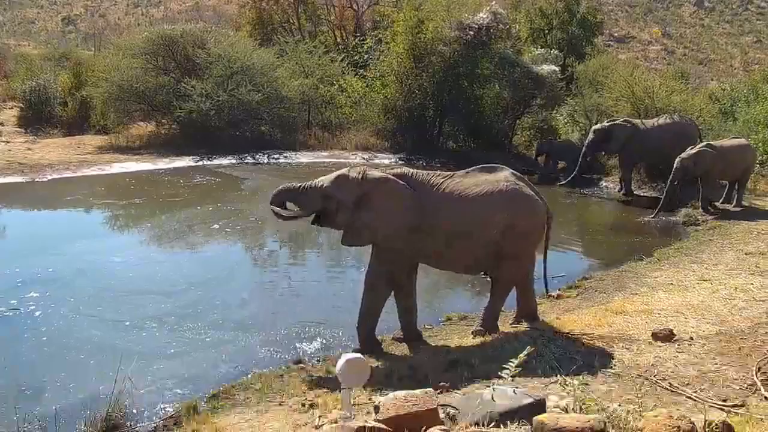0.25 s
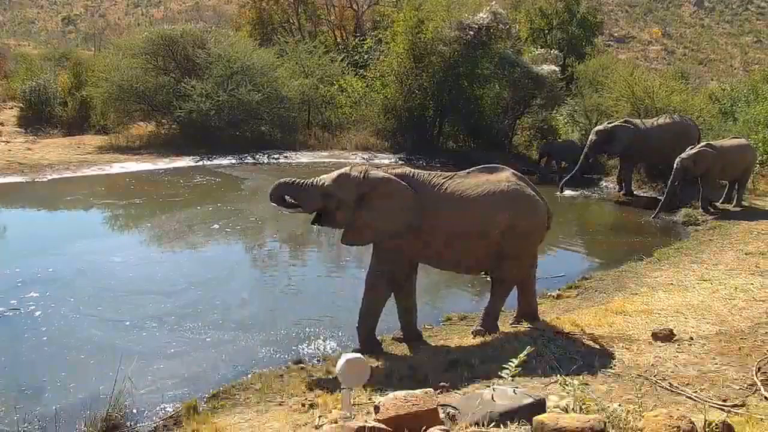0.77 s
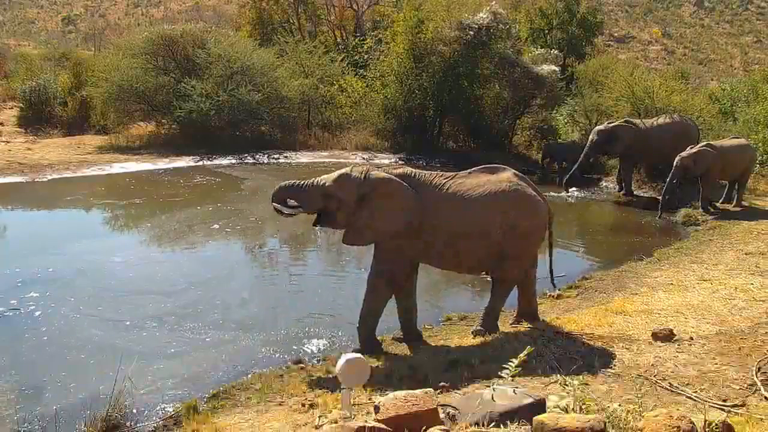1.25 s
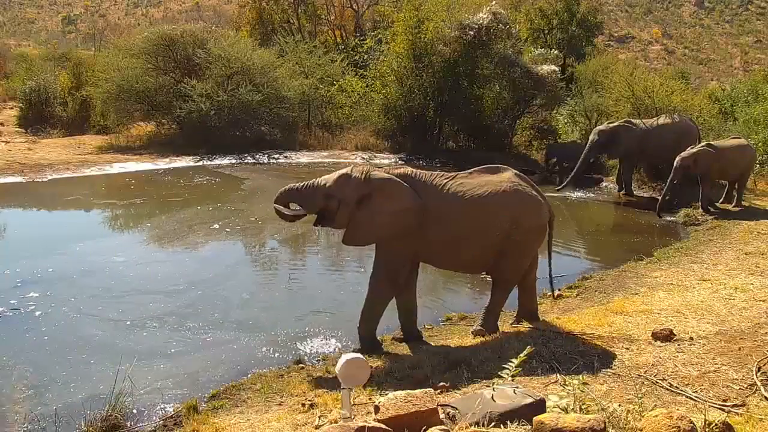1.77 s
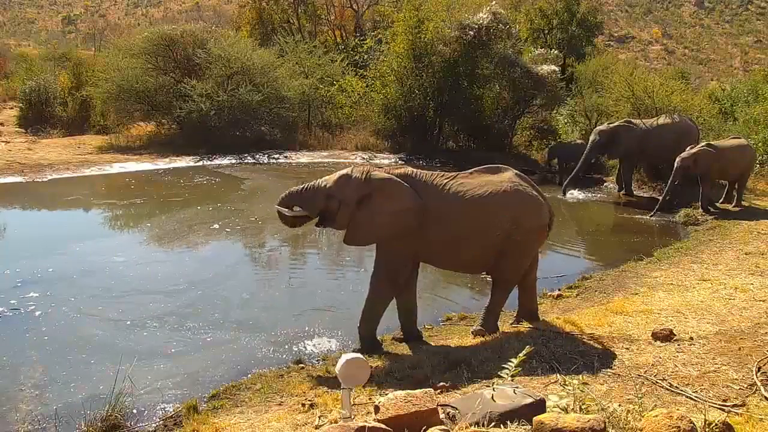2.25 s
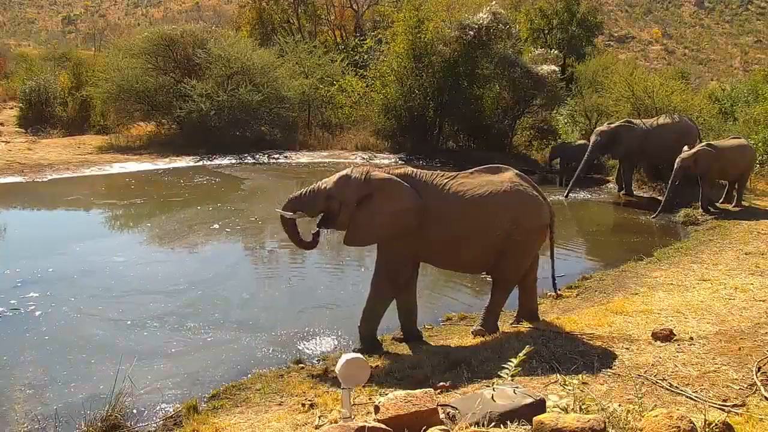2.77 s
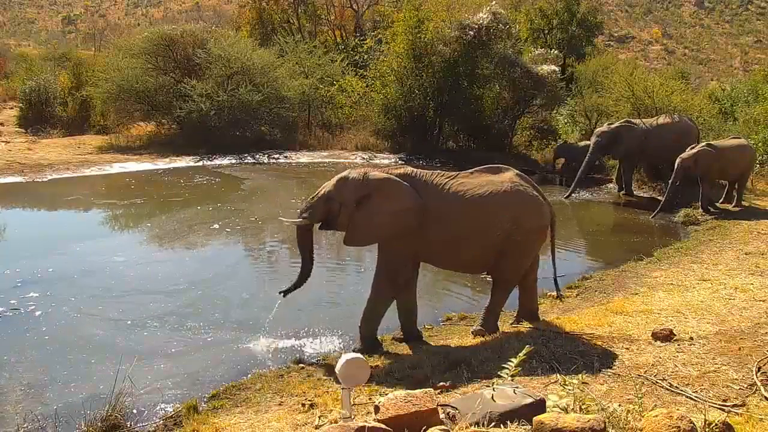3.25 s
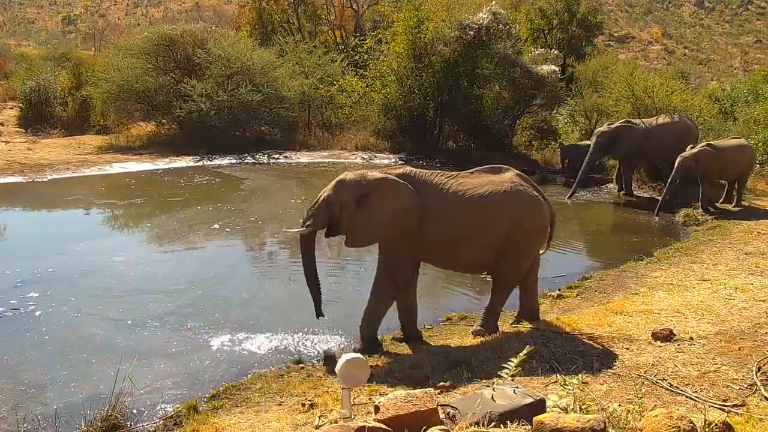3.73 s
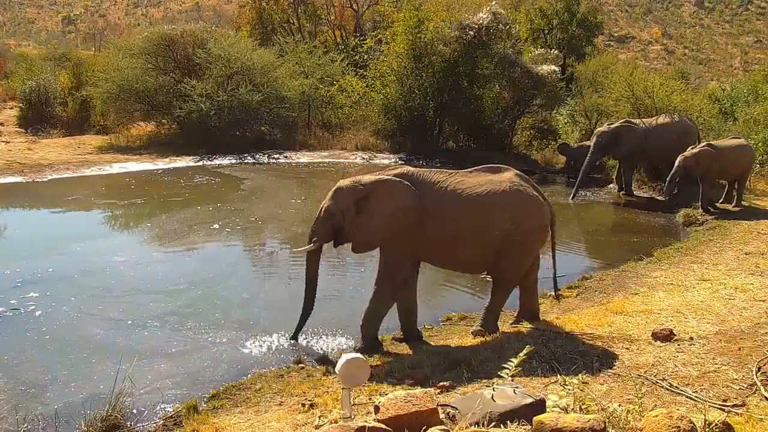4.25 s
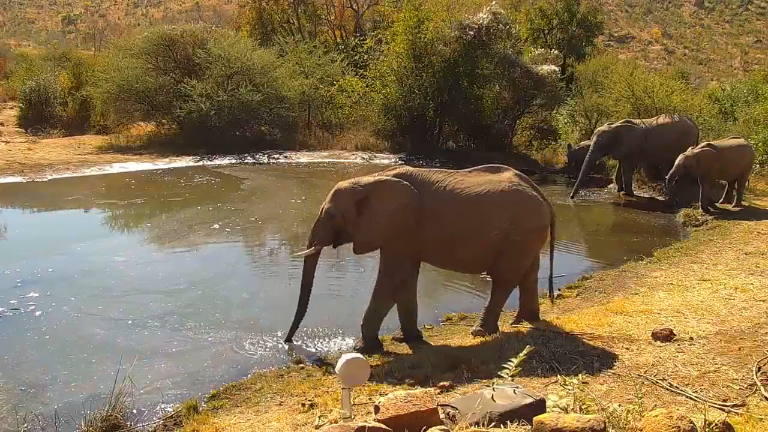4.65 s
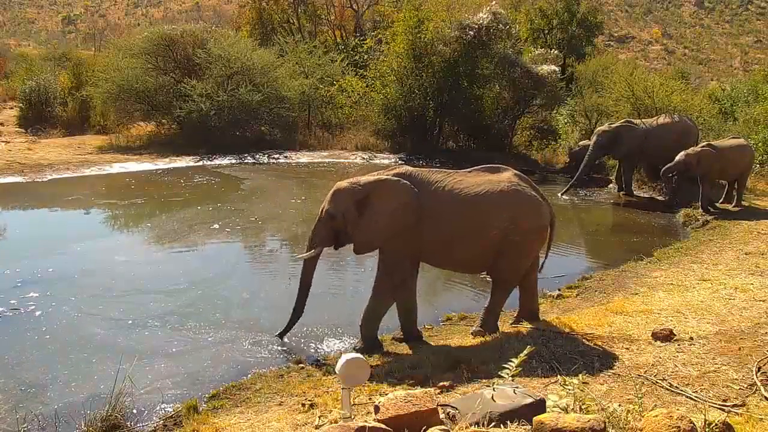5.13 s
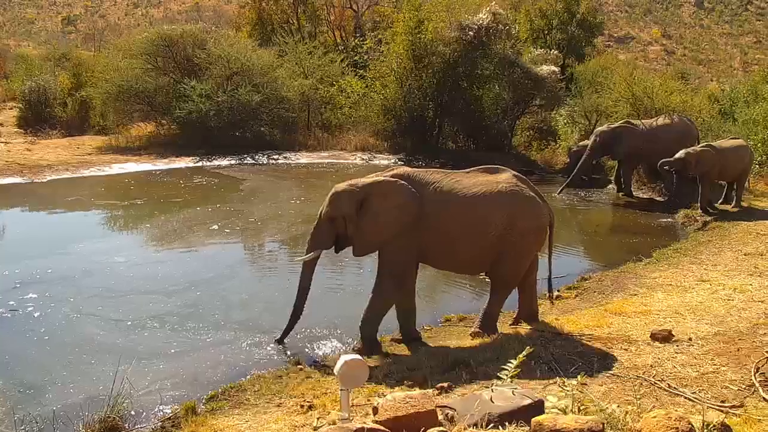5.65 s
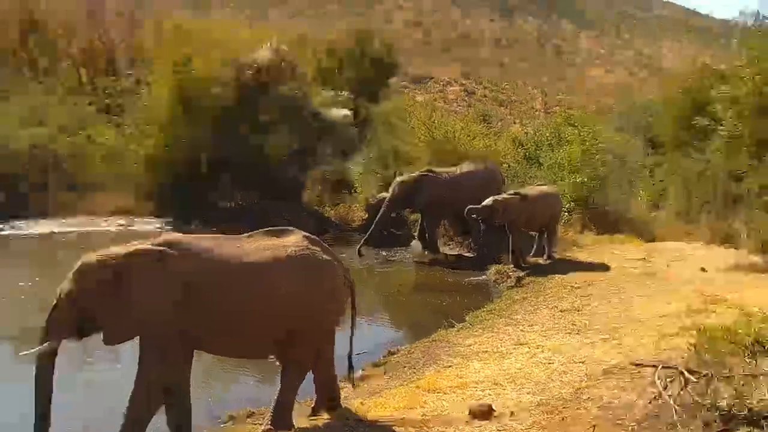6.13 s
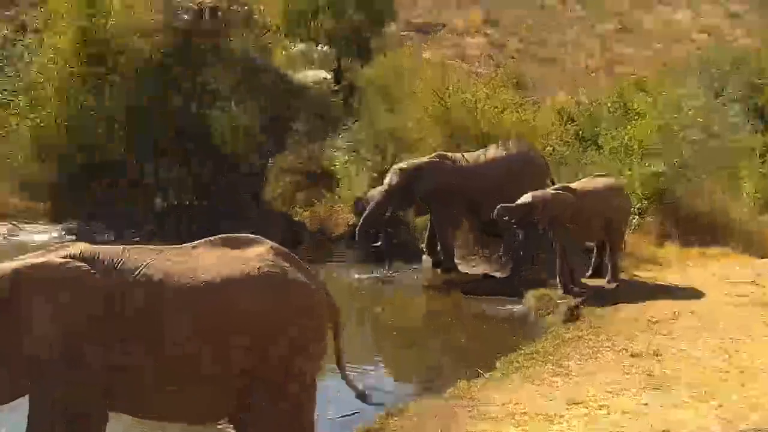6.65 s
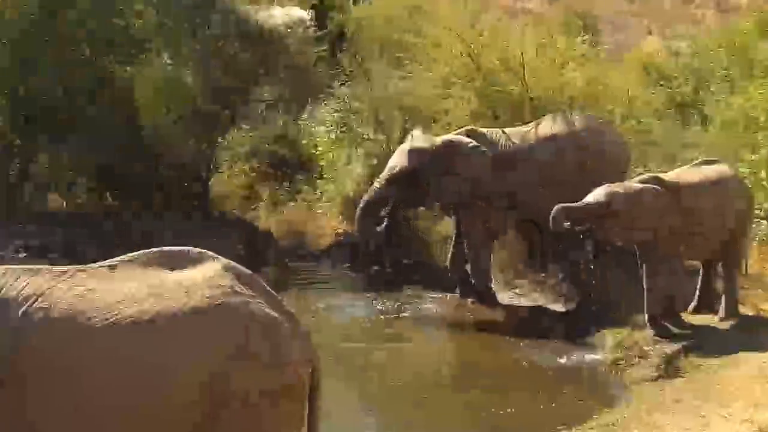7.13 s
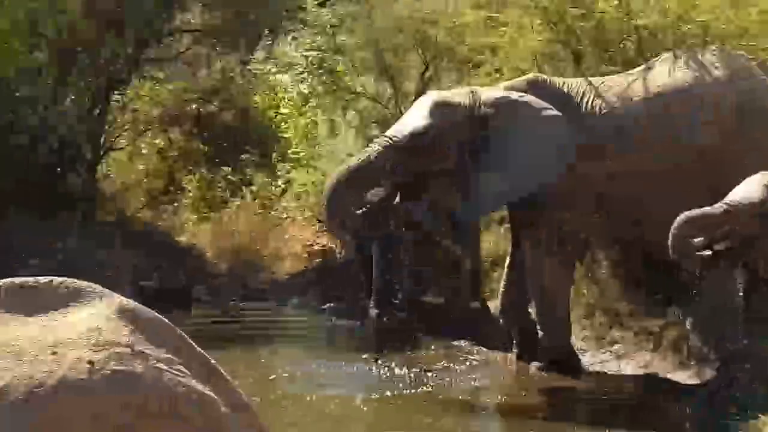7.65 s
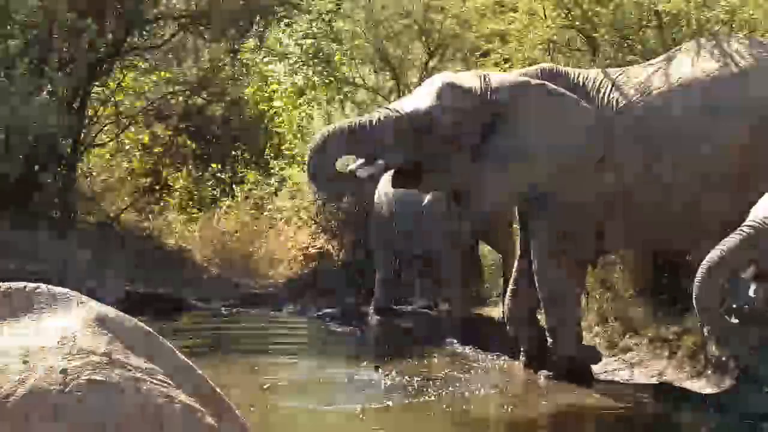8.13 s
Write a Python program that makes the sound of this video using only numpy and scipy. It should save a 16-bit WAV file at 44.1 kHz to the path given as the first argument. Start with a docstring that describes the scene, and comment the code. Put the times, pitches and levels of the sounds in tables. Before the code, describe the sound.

Water spills, drips and gulps from elephants' trunks at a pond, heard boxily, before a loud mechanical jolt, gritty grind and buzzing motor whirr.

```python
"""Elephants drinking at a waterhole

Heard by a microphone shut inside a remote camera's housing; cavity resonances colour the water and far rustle.
Trunks spill noise-burst sprays, ringing drops and gliding-sine gulps; a small bird chirps in gliding sines.
A pan drive jolts as decaying modes and grinds as filtered noise; a zoom drive whirrs as a comb of tones.
Beneath lie noise for wind, rustle and hiss, and steady multiples of the rectified mains."""
import sys
import numpy as np
from scipy import signal
from scipy.fft import rfft, irfft, next_fast_len
from scipy.io import wavfile
from scipy.ndimage import uniform_filter1d, map_coordinates

SR = 44100
rng = np.random.default_rng(int(sys.argv[2]) if len(sys.argv) > 2 else 0)


def dump(signal):
    """Clip the signal to [-1, 1] and save it as 16-bit WAV at the path in sys.argv[1]."""
    limited = np.clip(np.atleast_2d(signal).T, -1, 1)
    pcm = np.round(limited * 32767).astype(np.int16)
    wavfile.write(sys.argv[1], SR, pcm)


N = 369999

# WATER
# steady dribbling between spills: t/s, level/dB
TRICKLE = [(0, -54.5), (.7, -61), (1.05, -52), (1.35, -53.5), (1.85, -57), (2.1, -58), (3.05, -56.5),
           (3.7, -58), (4.1, -56), (4.55, -58), (5, -58), (5.5, -59.5), (6.58, -48.5), (7, -53),
           (7.4, -55.5), (8.39, -57)]
# water spilling from trunks and mouths: start t/s, build-up/s, hold/s, spray level/dB, fizz level/dB
SPILLS = [(0.155, 0.054, 0.04, -46.5, -68), (0.307, 0.037, 0.038, -47, -74),
          (0.465, 0.025, 0.043, -49, -69), (0.843, 0.033, 0.042, -46.5, -69.5), (1.17, .05, .03, -49, -81),
          (1.42, .15, 0.16, -46, -75), (1.916, 0.043, 0.026, -44.5, -69), (2.128, 0.032, 0.11, -46.5, -72),
          (2.307, 0.11, 0.13, -45.5, -65.5), (2.45, .12, .22, -42.5, -64.5),
          (2.817, .02, 0.021, -46, -65.5), (3.095, 0.027, .02, -53, -73), (3.179, 0.026, 0.24, -47.5, -65),
          (3.89, 0.026, 0.022, -55, -72), (4.245, 0.034, 0.087, -57, -75), (4.68, 0.055, 0.13, -55, -75),
          (5.353, .02, 0.028, -52.5, -82), (5.62, .04, 0.092, -55.5, -73), (5.746, 0.046, 0.13, -46, -63.5),
          (5.822, 0.13, 0.41, -42.5, -60.5), (6.047, .015, 0.032, -43.5, -58),
          (6.177, 0.018, .01, -40.5, -60.5), (6.282, 0.014, 0.16, -36.5, -57)]
# lapping at the edge: t/s, level/dB
LAPPING = [(0, -50), (.34, -40.5), (.65, -49), (1.4, -44), (2, -52), (2.6, -38), (3.05, -53), (3.24, -41),
           (3.42, -42), (3.56, -57.5), (4.25, -45.5), (4.7, -48), (4.87, -42), (5.1, -53), (5.6, -40.5)]
# spray spectrum: f/Hz, level/dB
SPRAY_BAND = [(500, -11.5), (1200, -7.5), (2000, 0), (4500, 2), (5200, -9.5), (6000, -29.5)]
# fizz spectrum: f/Hz, level/dB
FIZZ_BAND = [(4800, -20.5), (5600, 3.5), (9000, -1.5), (11000, 3)]
# lapping spectrum: f/Hz, level/dB
LAPPING_BAND = [(180, -27), (280, 0.5), (600, -6.5), (1200, -31)]
# single drops: t/s, peak/dB, f/Hz, tick over peak/dB
DROPS = [(0.2229, -39, 1980, -26), (0.5434, -42, 2920, 0), (0.6724, -38.5, 2850, -22),
         (0.8724, -39, 2740, -20), (1.2261, -33.5, 3450, -20), (1.3169, -34, 3460, -29),
         (1.4401, -38.5, 2010, -13), (1.5694, -36.5, 1970, -24), (1.702, -34, 2830, -28),
         (1.8744, -42, 3950, -5), (2.0722, -41, 4050, -22), (2.157, -38, 3950, -24),
         (2.5082, -35, 2880, -22), (2.5681, -29, 2930, -27), (2.5975, -30, 2730, -25),
         (2.6499, -28.5, 3500, -25), (3.2111, -32, 2900, -23), (3.2645, -33.5, 2900, -23),
         (3.3997, -37, 2900, -20), (3.4915, -36.5, 3440, -24), (3.5967, -34.5, 2860, -21),
         (3.7249, -34.5, 2760, -17), (3.8013, -28, 3020, -19), (3.9305, -34.5, 3020, -23),
         (4.0711, -38, 2920, -8), (4.119, -38, 3440, -23), (4.2632, -37, 2730, -18),
         (4.339, -38, 2850, -26), (4.4084, -41, 2880, -1), (4.7062, -33.5, 2780, -28),
         (4.8319, -35.5, 2730, -28), (5.0384, -36, 1990, -28), (5.2041, -31, 1900, -8),
         (5.448, -35, 2890, -25), (5.5702, -42.5, 2890, -3), (5.8576, -34, 2880, -24),
         (5.9304, -32.5, 2050, -17), (5.9678, -30, 1910, -21), (6.0541, -26, 1890, -20),
         (6.0794, -28.5, 2870, -16), (6.1823, -25.5, 2860, -27), (6.3041, -20, 2830, -12),
         (6.4028, -23, 1930, -28), (6.8495, -40, 2000, -13), (6.9396, -48, 2010, 3),
         (7.0304, -39.5, 3460, -18), (7.2125, -37.5, 3460, -14), (7.2737, -40, 4450, -8),
         (7.3238, -38.5, 2730, -14), (7.4525, -44, 2730, -6), (7.5188, -41, 4100, -20),
         (7.7952, -38, 3480, -15), (7.8166, -38, 4090, -6), (7.8955, -33.5, 3460, -13),
         (8.03, -41.5, 4450, -13), (8.1174, -32.5, 3460, -18), (8.2896, -34, 3370, -29),
         (8.3305, -40, 4440, -6)]
# bright edge of a drop: f/Hz, level/dB
TICK_BAND = [(3300, -18.5), (4300, 0), (7000, -0.5), (11000, -7.5)]
# large bubbles: t/s, peak before envelope/dB, start f/Hz
GULPS = [(.332, -21, 368), (1.035, -24, 302), (1.118, -24.5, 370), (1.443, -21, 322), (1.649, -24.5, 356),
         (1.99, -19, 353), (2.286, -25, 368), (2.442, -27, 175), (2.445, -21, 329), (2.565, -16.5, 366),
         (2.634, -16, 360), (3.24, -25, 351), (3.316, -21, 365), (4.358, -24.5, 250), (4.859, -19, 293),
         (4.884, -24, 302), (5.196, -17.5, 493), (5.2, -30.5, 1363), (5.2, -27.5, 252), (5.441, -16, 372),
         (5.566, -21, 352), (7.15, -36, 1390)]
# low thud: t/s, gain/dB, push time/s
THUD = (2.446, -27.5, 0.00083)
BUILD_DB, FALL_DB_PER_S = 11.5, 114
FIZZ_OVER_TRICKLE_DB = -17.5
GURGLE_DB, GURGLE_KNOTS_PER_S = 1.5, 14  # random unevenness of the flow
DROP_T60_S, GULP_T60_S = 0.043, 0.067

# DRIVES
# start of the pan drive: t/s, gain/dB
JOLT = (5.654, -4.5)
# frame modes rung by the jolt: f/Hz, level/dB, undamped t60/s
FRAME = [(275, -23.5, 0.23), (361, -9, 0.096), (374.3, -1.5, 0.21), (425, -6, 0.068), (493, -4.5, 0.083),
         (732, -29, 0.15), (1250, -27, 0.06)]
# pan drive: t/s, grind level/dB, teeth level/dB
PAN = [(5.7, -49, -48.5), (5.755, -38.5, -41), (5.785, -23.5, -46), (5.96, -23, -46), (6.12, -21, -44),
       (6.2, -23.5, -53.5), (6.25, -30.5, -52), (6.4, -42, -48)]
# gear resonances under the grind: f/Hz, width/Hz, level/dB
GEARS = [(258, 9.3, -9), (343, 15.7, -0.5), (374, 20, -7.5), (457.8, 24.3, 1.5), (504.4, 19.5, -5)]
# gear tooth resonances: f/Hz, width/Hz, level/dB
TEETH = [(972, 30, -5), (1242, 105, -3.5), (1335, 82, -5)]
# band limits of the grind: f/Hz, level/dB
GRIND_BAND = [(200, -36), (260, -4.0), (530, -3.5), (620, -17.5), (900, -21)]
# zoom drive: t/s, level/dB
ZOOM = [(6.25, -31.5), (6.4, -32), (6.75, -30), (7.03, -27), (7.06, -37), (7.1, -26), (7.3, -32.5),
        (7.62, -31.5), (7.66, -42), (7.75, -33), (7.88, -45), (8.1, -42.5), (8.39, -51)]
# zoom tones: multiple of STEP_HZ, level when wide/dB, level when zoomed in/dB
ZOOM_TONES = [(12, -22, -27), (13, -7, -2.5), (14, -7, -9), (15, -0.5, 0.5), (16, -6.5, -5),
              (17, -0.5, -8.5), (18, -11.5, -13), (19, -21, -8), (20, -13.5, -10.5), (21, -6, -20),
              (22, -19.5, -22.5), (23, -23.5, -34.5), (33, -33, -23.5), (34, -23, -17)]
# high band of the zoom gearing: f/Hz, width/Hz, level over drive/dB
WHIRR = (1350, 140, -30.5)
# murmur of the zoom drive: f/Hz, level/dB
MURMUR_BAND = [(270, -23), (320, -2.0), (540, -8.0), (620, -13.5), (760, -15.5), (900, -31)]
THROB_DB = 0.5
STEP_HZ = 25.04  # repeat rate of the zoom drive's moves

# BIRD
# rising chirps: t/s, length/s, start f/Hz, level/dB
CHIRPS = [(.14, .06, 6100, -64), (.27, .04, 6400, -70), (1.183, .035, 6300, -67), (6.682, .05, 6400, -70),
          (6.68, .045, 7900, -69), (6.785, .035, 7950, -67), (6.79, .03, 6300, -62),
          (6.833, .035, 6500, -70), (7.615, .04, 6400, -63)]
# falling peeps: t/s, length/s, start f/Hz, level/dB
PEEPS = [(1.756, .03, 4200, -54), (1.855, .03, 4250, -48), (1.948, .03, 4250, -48),
         (2.063, 0.038, 4300, -48), (6.9, .025, 6900, -67), (7.235, .025, 6500, -66),
         (7.49, .02, 6700, -68), (7.747, .022, 5550, -53), (8.096, .055, 2950, -46.5)]
CHIRP_RISE_HZ_PER_S = 9300
PEEP_FALL_PER_S = 3  # share of start pitch lost a second

# BACKGROUND
# mains tones: multiple of MAINS_HZ, level/dB
HUM = [(5, -55), (7, -66.5), (8, -83), (9, -61.5), (11, -108), (13, -68.5), (14, -72.5), (15, -73.5)]
# whine of the pan motor at rest: multiple of MAINS_HZ, level/dB, end t/s
HOLD = (12, -56.5, 5.66)
# faint unsteady tone of the housing: f/Hz, level/dB
WAVER = (243, -61)
# wind on the housing: t/s, level/dB
WIND = [(0, -56), (1.3, -58.5), (1.75, -52.5), (2.4, -51.5), (2.7, -56.5), (3.6, -56.5), (3.97, -50.5),
        (4.5, -55), (5.6, -57.5), (5.7, -50.5), (6.15, -48), (6.3, -55.5), (7.1, -53.5), (8.39, -60)]
# wind spectrum: f/Hz, level per Hz/dB
BUFFET_BAND = [(15, -29.5), (25, -11), (50, -7.5), (90, -6.5), (130, 0), (200, -2.5), (300, -1.5)]
# distant bush and water: f/Hz, level/dB
AIR_BAND = [(150, -20), (300, 6), (1000, -1), (3000, -4), (6000, -7), (11000, -3)]
# microphone hiss: f/Hz, level/dB
HISS_BAND = [(100, -2.5), (1000, -7.5), (5000, -21.5), (9000, -32.5), (12000, -33)]
MAINS_HZ = 99.9  # rectified mains

# HOUSING AND RECORDER
# cavity resonances: f/Hz, width/Hz, level/dB
HOUSING = [(240, 40, -12), (370, 45.4, 3.5), (475.6, 61.5, 0), (686.5, 47.4, -6), (880, 45, -8),
           (974, 36, -9), (1280, 145, -11.5), (1900, 59.6, -10), (1992.5, 52, -8.5), (2740, 59, -11.5),
           (2890, 70, -10), (3043, 196, -17.5), (3460, 74, -12), (3950, 163, -19), (4162, 60, -17.5),
           (4450, 44, -20.5), (5030, 114, -18), (5470, 69, -28.5), (5700, 48, -43.5), (6450, 550, -35),
           (6970, 640, -35.5), (8190, 370, -34.5), (8770, 340, -37), (9900, 100, -42), (10730, 300, -48)]
# cancellation between two low cavity modes: f/Hz, width/Hz, depth/dB
NOTCH = (440, 72, -11.5)
TOP_HZ = 11150


def water():
    """Spray of droplets and bubbles, fine fizz following the flow, and lapping, all through the cavity."""
    spray_gain, fizz_gain = flow()
    splashes = unit(droplets(rate_per_s=150, spread_db=3.5, life_s=0.0015, bed=2.6))
    rain = splashes + 0.37 * bubbles(count=3500, centre_hz=4300, octaves=0.497, cycles=4.1, spread_db=2.5)
    ticks = unit(droplets(rate_per_s=42, spread_db=4.5, life_s=0.0013, bed=1.0))
    mist = ticks + .7 * rain
    spray = unit(filtered(rain, shape(SPRAY_BAND), cavity))
    fizz = unit(filtered(mist, shape(FIZZ_BAND), cavity))
    laps = droplets(rate_per_s=33, spread_db=2.5, life_s=0.0048, bed=2.2)
    laps = unit(filtered(laps, shape(LAPPING_BAND), cavity))
    lapping_gain = amp(curves(LAPPING)[0] + 2.6 * wobble(12))
    return spray_gain * spray + fizz_gain * fizz + lapping_gain * laps


def flow():
    """Gains of spray and fizz: powers of trickle and spills add, each spill building, holding and falling."""
    t = np.arange(N) / SR
    power = amp(2 * (curves(TRICKLE)[0] + np.array([[0], [FIZZ_OVER_TRICKLE_DB]])))
    for start_s, build_s, hold_s, spray_db, fizz_db in SPILLS:
        top_s = start_s + build_s
        build_loss_db = BUILD_DB * np.clip((top_s - t) / build_s, 0, 1)
        fall_loss_db = FALL_DB_PER_S * np.clip(t - top_s - hold_s, 0, 1)
        level_db = np.array([[spray_db], [fizz_db]]) - build_loss_db - fall_loss_db
        power = power + (t > start_s) * amp(2 * level_db)
    return np.sqrt(power) * amp(GURGLE_DB * wobble(GURGLE_KNOTS_PER_S))


def droplets(rate_per_s, spread_db, life_s, bed):
    """Short noise bursts of unequal size over a bed of noise."""
    hits = (rng.random(N) < rate_per_s / SR) * amp(spread_db * rng.standard_normal(N))
    u = np.arange(SR // 20) / SR / life_s
    bursts = unit(signal.fftconvolve(hits, u * np.exp(-u))[:N])
    return (bursts + bed) * rng.standard_normal(N)


def bubbles(count, centre_hz, octaves, cycles, spread_db):
    """Tiny bubbles at random times, each a few cycles of its own rising pitch."""
    draw, t = rng.standard_normal((count, 2)), np.arange(500) / SR
    hz = np.clip(centre_hz * 2 ** (octaves * draw[:, :1]), 500, SR / 3)
    u = t * hz / cycles
    envelope = amp(spread_db * draw[:, 1:]) * u * np.exp(-u)
    grain = envelope * np.sin(2 * np.pi * hz * t * (1 + 0.0285 * u))
    at = rng.integers(0, N, (count, 1)) + np.arange(len(t))
    return unit(np.bincount(at.ravel(), grain.ravel(), N)[:N])


def drops():
    """Each drop is a splat of noise round its pitch with a bright tick, both rung by the housing."""
    out, t = np.zeros(N), np.arange(SR // 10) / SR
    click = np.arange(N) == 100
    body = filtered(click, cavity)[100:len(t)]
    edge = filtered(click, shape(TICK_BAND), cavity)[:len(t)]  # keeps the 100-sample lead
    fall = amp(-60 * t / DROP_T60_S) * (1 - np.exp(-t / 0.00026))
    for s, db, hz, tick_db in DROPS:
        splat = signal.lfilter(*signal.iirpeak(hz, 3.6, SR), rng.standard_normal(len(t)))
        splat = signal.fftconvolve(fall * splat, body)
        tick = signal.fftconvolve(fall * rng.standard_normal(len(t)), edge)
        add(out, s - .001, amp(db) * peak_unit(splat))
        add(out, s - .003, amp(db + tick_db) * peak_unit(tick))
    return out


def gulps():
    """Large bubbles: sines with a soft start, exponential decay and slightly rising pitch."""
    out, t = np.zeros(N), np.arange(SR // 5) / SR
    swell = amp(-60 * t / GULP_T60_S) * (1 - np.exp(-t / 0.0051)) ** 2
    for s, db, hz in GULPS:
        tone = np.sin(2 * np.pi * hz * t * (1 + 1.0 * t) + rng.uniform(0, 2 * np.pi))
        add(out, s - .003, amp(db) * swell * tone)
    return out


def thud():
    """A single push of air and its rebound, with no ring."""
    out, (s, db, push_s) = np.zeros(N), THUD
    u = np.arange(SR // 20) / SR / push_s
    add(out, s, amp(db) * u * u * (3 - u) * np.exp(-u))
    return out


def pan_drive():
    """A jolt rings the frame until the gears take up their play, then they grind in uneven throbs."""
    out, t = np.zeros(N), np.arange(SR // 3) / SR
    ring = sum(amp(db - 60 * t / t60_s) * np.sin(2 * np.pi * hz * t) for hz, db, t60_s in FRAME)
    damping = 1 / (1 + np.exp((t - .078) / 0.0043))
    onset = (1 - np.exp(-t / 0.0045)) ** 2
    add(out, JOLT[0], amp(JOLT[1]) * ring * damping * onset)
    grind_db, teeth_db = curves(PAN)
    rubbing = droplets(rate_per_s=110, spread_db=-6.5, life_s=0.0087, bed=1.8)
    grind = filtered(rubbing, modes(GEARS), shape(GRIND_BAND))
    grind = levelled(grind, SR // 14)  # steady load: no long swells or gaps
    teeth = droplets(rate_per_s=48, spread_db=3.5, life_s=0.0048, bed=0.99)
    teeth = unit(filtered(teeth, modes(TEETH), modes(TEETH)))
    return out + amp(grind_db + THROB_DB * wobble(25)) * grind + amp(teeth_db) * teeth


def zoom_drive():
    """A repeating move gives a comb of tones; each wavers, and their balance shifts as the lens travels."""
    t = np.arange(N) / SR
    travel = np.clip((t - 6.75) / 0.56, 0, 1)
    comb = np.zeros(N)
    for k, wide_db, near_db in ZOOM_TONES:
        gain = amp(wide_db + (near_db - wide_db) * travel + 2.4 * wobble(5))
        jitter = k * (0.024 * wobble(5) + 0.0092 * wobble(40))
        comb += gain * np.sin(2 * np.pi * k * STEP_HZ * t + jitter + rng.uniform(0, 2 * np.pi))
    comb = levelled(comb, SR // 4)
    murmur = unit(filtered(rng.standard_normal(N), shape(MURMUR_BAND), cavity))
    whirr = unit(filtered(rng.standard_normal(N), modes([WHIRR]), modes([WHIRR])))
    running = np.clip((7.85 - t) / 0.044, 0, 1)  # only the murmur outlasts the motor
    drive = running * (comb + amp(WHIRR[2]) * whirr) + (1 - 0.66 * running) * murmur
    return amp(curves(ZOOM)[0]) * drive


def bird():
    """Thin gliding sine chirps and peeps, made slightly hoarse by fast random level changes."""
    out = np.zeros(N)
    notes = [(s, dur_s, hz, CHIRP_RISE_HZ_PER_S * dur_s, db) for s, dur_s, hz, db in CHIRPS]
    notes += [(s, dur_s, hz, -PEEP_FALL_PER_S * dur_s * hz, db) for s, dur_s, hz, db in PEEPS]
    for s, dur_s, from_hz, glide_hz, db in notes:
        u = np.linspace(0, 1, round(dur_s * SR))
        phase = 2 * np.pi * np.cumsum(from_hz + glide_hz * u) / SR
        add(out, s, amp(db) * np.sin(np.pi * u) * np.sin(phase))
    return out * amp(2.5 * wobble(150))


def hum():
    """Multiples of the rectified mains, the pan motor's whine until it moves, and a housing tone."""
    t = np.arange(N) / SR

    def tone(hz, db):
        gain = np.sqrt(2) * amp(db + 0.62 * wobble(3.7))
        return gain * np.sin(2 * np.pi * hz * t + rng.uniform(0, 2 * np.pi))

    mains = sum(tone(k * MAINS_HZ, db) for k, db in HUM)
    hold_k, hold_db, hold_end_s = HOLD
    whine = tone(hold_k * MAINS_HZ, hold_db) * (t < hold_end_s)
    return mains + whine + tone(*WAVER) * amp(3.0 * wobble(5.1))


def background():
    """Noise for far rustle through the cavity, wind on the housing and microphone hiss."""
    far = unit(filtered(rng.standard_normal(N), shape(AIR_BAND), cavity))
    buffet = unit(amp(1.8 * wobble(9)) * filtered(rng.standard_normal(N), shape(BUFFET_BAND)))
    hiss = unit(filtered(rng.standard_normal(N), shape(HISS_BAND)))
    far_gain = amp(-47 + 0.69 * wobble(2.94))
    return far_gain * far + amp(curves(WIND)[0]) * buffet + amp(-57.5) * hiss


def cavity(f):
    """Causal response of the housing: its resonances times one notch."""
    c, w, db = NOTCH
    notch = (c * c - f * f + 1j * f * w * amp(db)) / (c * c - f * f + 1j * f * w)
    return modes(HOUSING)(f) * notch


def modes(table):
    """Causal response of a set of resonances, alternating in sign."""
    def response(f):
        return sum((-1) ** k * amp(db) * 1j * f * w / (c * c - f * f + 1j * f * w)
                   for k, (c, w, db) in enumerate(table))
    return response


def shape(points):
    """Gain from (f/Hz, level/dB) points on a log axis, closed beyond its ends."""
    f, db = np.transpose(points)
    return lambda hz: amp(np.interp(np.log(hz + 1), np.log(f + 1), db, -120, -120))


def filtered(x, *responses):
    """x filtered by the product of the frequency responses."""
    m = next_fast_len(N + SR // 2)
    hz = np.fft.rfftfreq(m, 1 / SR)
    return irfft(rfft(x, m) * np.prod([r(hz) for r in responses], axis=0), m)[..., :N]


def curves(rows):
    """One value per sample for each dB column, fading quickly to silence outside the rows."""
    s, *cols = np.transpose(rows)
    edges = np.r_[s[0] - .04, s, s[-1] + .04]
    t = np.arange(N) / SR
    return [np.interp(t, edges, np.r_[c[0] - 40, c, c[-1] - 40], -120, -120) for c in cols]


def wobble(knots_per_s):
    """A smooth random curve through normally distributed knots."""
    knots = rng.standard_normal(int(N * knots_per_s / SR) + 4)
    return map_coordinates(knots, [np.arange(N) * knots_per_s / SR])


def amp(db):
    """dB to amplitude."""
    return 10 ** (np.asarray(db) / 20)


def unit(x):
    """Scale to unit RMS."""
    return x / np.sqrt(np.mean(x ** 2) + 1e-20)


def peak_unit(x):
    """Scale to unit peak."""
    return x / np.abs(x).max()


def levelled(x, size):
    """Divide by the running RMS over size samples."""
    return x / np.sqrt(np.abs(uniform_filter1d(x ** 2, size=size)))


def add(track, s, sound):
    """Mix a sound in at s seconds."""
    part = track[round(s * SR):][:len(sound)]
    part += sound[:len(part)]


def scene():
    """Sum of all sources, one channel."""
    wet = water() + drops() + gulps() + thud()
    drives = pan_drive() + zoom_drive()
    return (wet + drives + bird() + hum() + background())[None]


def record(dry):
    """The recorder cuts steeply at its band limit and adds a very faint noise floor."""
    banded = filtered(dry, lambda hz: 1 / (1 + (hz / TOP_HZ) ** 300))
    return banded + amp(-104) * rng.standard_normal(dry.shape)


dry = scene()
out = record(dry)
dump(out)
```